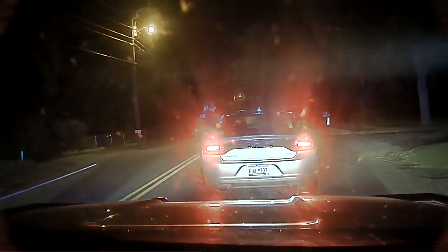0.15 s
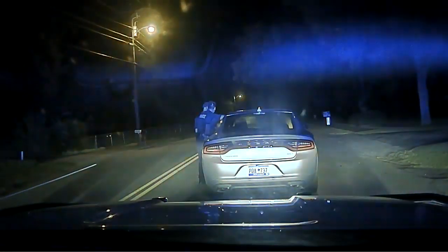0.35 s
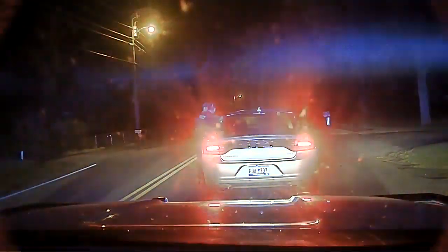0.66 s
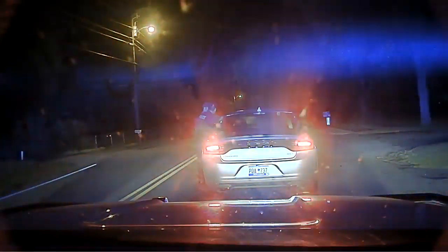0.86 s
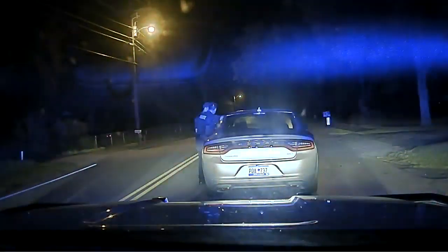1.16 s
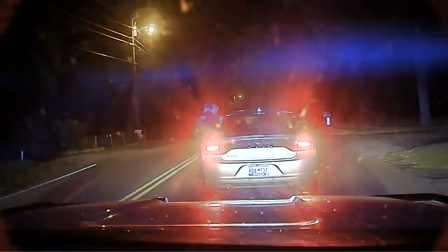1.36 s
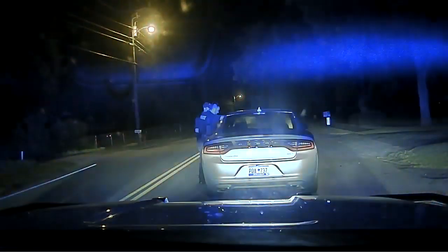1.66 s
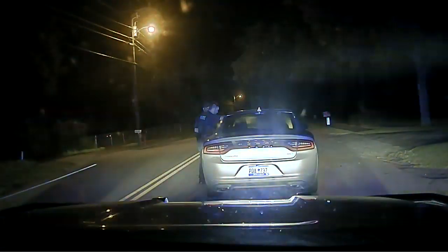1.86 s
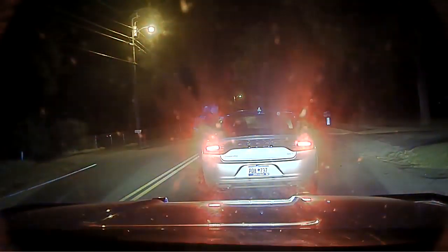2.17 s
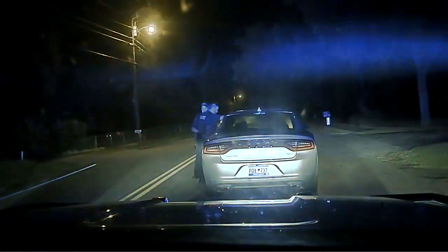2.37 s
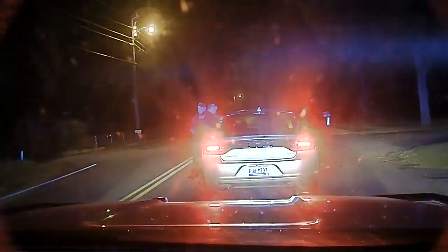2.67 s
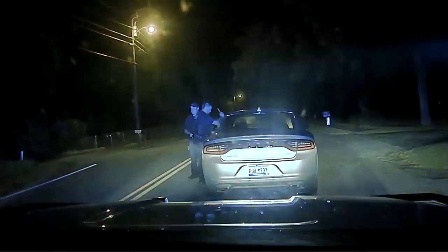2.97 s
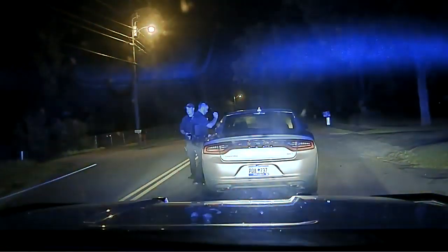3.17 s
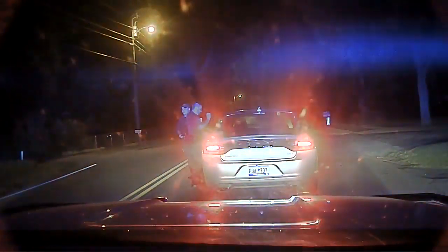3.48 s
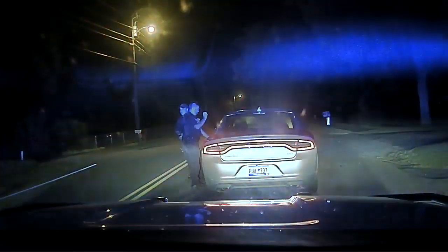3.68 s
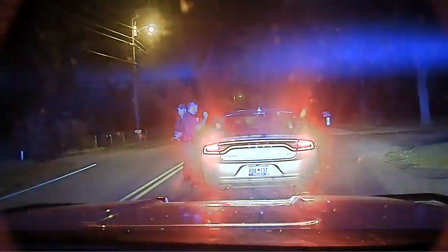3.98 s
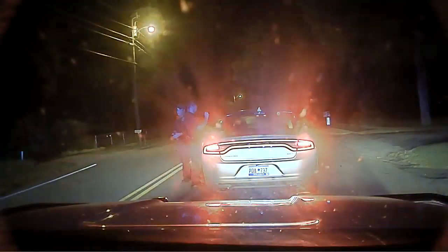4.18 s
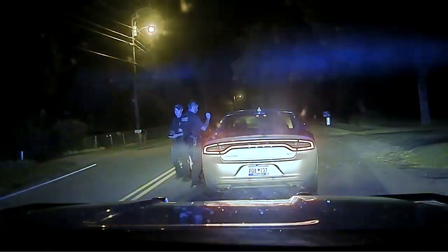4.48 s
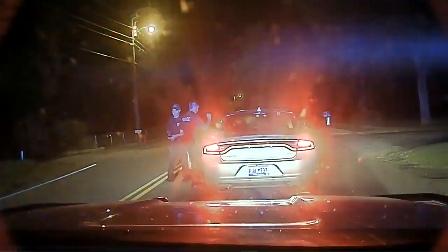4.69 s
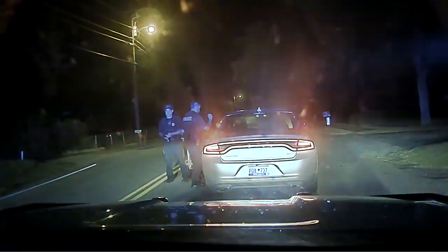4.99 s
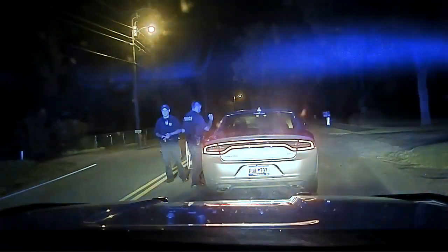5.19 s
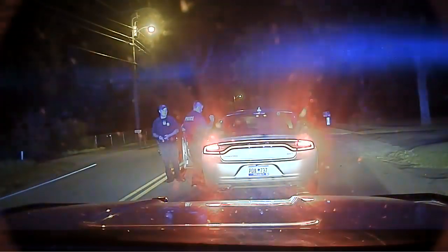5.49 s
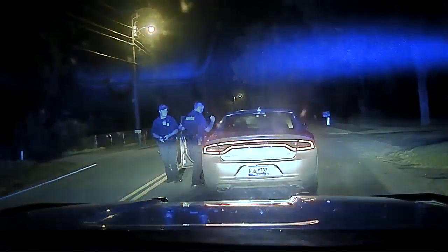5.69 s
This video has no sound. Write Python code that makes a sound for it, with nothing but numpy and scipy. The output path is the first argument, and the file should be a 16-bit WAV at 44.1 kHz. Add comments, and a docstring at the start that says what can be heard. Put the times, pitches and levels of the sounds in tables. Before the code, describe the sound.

Hard overloaded car door slam beside an idling vehicle, faint metallic tinkles, then scattered muffled thuds and scratchy handling scuffs over hiss.

```python
"""A car door slams hard enough to overload the microphone, beside an idling car at night.
Blows ring the body modes and rattle the trim; later knocks strike the same body, with gritty scuffs of dense grains.
Small metal parts tinkle as wavering sines. Behind them a low firing tone with a filtered-noise drone idles on,
a grainy rustle comes and goes, and the preamp hisses. One microphone feeds only the right channel."""
import sys
import numpy as np
from scipy import signal
from scipy.fft import rfft, irfft
from scipy.io import wavfile
from scipy.ndimage import uniform_filter1d

SR = 44100
rng = np.random.default_rng(int(sys.argv[2]) if len(sys.argv) > 2 else 0)


def inscribe(sig):
    """Save sig as 16-bit PCM at rate SR to the path in sys.argv[1].

    A 1-D sig is mono; a 2-D sig holds one channel per row.
    Samples are clipped to [-1, 1] before scaling.
    """
    pcm = np.round(np.clip(np.atleast_2d(sig).T, -1, 1) * 32767)
    wavfile.write(sys.argv[1], SR, pcm.astype(np.int16))


def natural_amplitude(level_db):
    """Convert a level in decibels to a linear amplitude factor, elementwise."""
    exponent = np.asarray(level_db, float) / 20
    return 10 ** exponent


N = 257984
T = np.arange(N) / SR


def level(x, db):
    """Scale to an rms level in dB."""
    return x * natural_amplitude(db) / np.sqrt(np.mean(x ** 2))


def bin_hz(count):
    """Frequencies of the rfft bins of a sound of this many samples."""
    return np.arange(count // 2 + 1) * SR / count


def colour(x, points):
    """Filter by (Hz, dB) points joined on a log-frequency axis."""
    hz, db = np.transpose(points)
    f = np.maximum(bin_hz(len(x)), 1)
    gain_db = np.interp(np.log(f), np.log(hz), db, left=-60, right=-60)
    return irfft(rfft(x) * natural_amplitude(gain_db), len(x))


def walk(rate):
    """Random levels held 1 / rate s and slewed twice; spread near 1."""
    hold = int(SR / rate)
    steps = np.repeat(rng.standard_normal(N // hold + 1), hold)
    return 1.17 * uniform_filter1d(uniform_filter1d(steps, hold), hold)[:N]


def fade(t, rise_s, t60):
    """Smooth rise, then exponential decay by 60 dB in t60 seconds."""
    rise = (1 - np.exp(-t / max(rise_s, 1e-4))) ** 2
    return rise * np.exp(-np.log(1000) * t / max(t60, .01))


def add(out, s, x, peak_db):
    """Mix a sound in at time s with a given peak."""
    i = int(s * SR)
    out[i:i + len(x)] += (x * natural_amplitude(peak_db) / np.abs(x).max())[:N - i]


# What the car body rings with.
# Each row: mode in Hz, relative level in dB, t60 in seconds at ring factor 1.
BODY_MODES = [(50.2, -2, 0.67), (65.12, 1, 1), (84.6, -9, 0.73), (105, 3, 0.5), (121.2, 5.5, 0.45),
              (133.9, 3.5, 0.46), (169.5, -2.5, 0.42), (187.34, 6.5, 0.54), (217.1, -9.5, 0.51),
              (237.4, -6.5, 0.63), (268.4, -2, 0.29), (315, -7, 0.19), (339.6, 0.5, 0.41), (373.6, 7, 0.26),
              (442.5, 6, 0.22), (478, -8.5, 0.21), (526.4, 9, 0.2), (578.8, 10.5, 0.13), (635, -2, 0.12),
              (684, -7.5, 0.07), (776.3, 6, 0.16), (843, -4.5, 0.37), (905, 1.5, 0.1), (984.6, 4.5, 0.091)]
# How long the rattling trim and panels sound. Each row: frequency in Hz, t60 in seconds at ring factor 1.
RATTLE_DECAY = [(40, 0.48), (150, 0.42), (500, 0.43), (1500, 0.22), (4000, 0.036), (10000, 0.036)]


def blow(centre_hz, slope_db, ring, rattle_db):
    """One blow: body modes near the favoured pitch ring most; trim and panels rattle as dense decaying noise."""
    t = T[:2 ** 15]
    push_s = 1 / centre_hz  # a softer contact pushes longer and sounds lower

    def weight(f):
        """Fall-off away from the favoured pitch, gentler below it."""
        side = np.where(f > centre_hz, 1, 0.56)
        return natural_amplitude(slope_db * np.abs(np.log2(f / centre_hz)) * side)

    modes = 0
    for hz, db, t60 in BODY_MODES:
        phase = 0.94 * rng.standard_normal()  # the modes set off nearly together
        tone = np.sin(2 * np.pi * hz * t + phase)
        modes = modes + natural_amplitude(db) * weight(hz) * tone * fade(t, push_s, ring * t60)

    spectrum = rfft(rng.standard_normal(len(t)))
    f = bin_hz(len(t))
    hz, t60 = np.transpose(RATTLE_DECAY)
    rattle = 0
    for mid_hz in 60 * 2 ** np.arange(0, 7.6, .5):
        band = irfft(spectrum * np.exp(-(np.log2((f + 1) / mid_hz) / .3) ** 2), len(t))
        muffled = weight(mid_hz) / (1 + (mid_hz / 2200) ** 2)  # padded trim swallows the treble
        band_t60 = ring * np.interp(np.log(mid_hz), np.log(hz), t60)
        rattle = rattle + muffled * band / band.std() * fade(t, min(push_s, .004), band_t60)
    return modes + natural_amplitude(rattle_db) * rattle


# The slam and the later knocks on the car body. Each row: start in seconds, peak in dB before the preamp,
# favoured pitch in Hz, fall-off above that pitch in dB per octave, ring length as a factor.
BLOWS = [(0.228, -37.5, 297, -1.5, 0.59), (0.257, -28, 300, -2, 0.27), (0.299, -14.5, 487, -6.5, 0.32),
         (0.308, -8, 415, -6.5, 0.19), (0.317, 6, 79.3, -4.5, 0.68), (0.321, -8.5, 1510, -1, 0.25),
         (0.342, -11.5, 1300, -2.5, 0.42), (0.355, -5, 250, -2.5, 0.51), (0.363, -11, 1700, -0.5, 0.58),
         (0.381, -17.5, 900, -1, 0.84), (0.400, -5.5, 110, -5, 0.3), (0.443, -11, 91, -6, 0.46),
         (0.515, -39, 1250, -12, 0.39), (0.52, -25, 70, -21, 0.35), (1.68, -23.5, 101, -24, 0.33),
         (2.237, -24.5, 408, -6, 0.7), (2.556, -11, 162, -10.5, 1.16), (2.709, -25.5, 370, -17, 0.24),
         (3.365, -25.5, 125, -17, 1.23), (3.607, -17, 135, -11, 0.62), (3.946, -27.5, 105, -23, 1.7),
         (4.162, -16.5, 123, -17.5, 0.69), (4.723, -29.5, 123, -12.5, 0.47), (5.489, -37, 305, -4, 0.86)]
# The closing door pumps the cabin air.
# One row: start in seconds, peak in dB before the preamp, pitch in Hz, t60 in seconds.
AIR_PUMP = (0.345, -11.5, 26.5, .46)


def knocks():
    """The slam (seal, latch, main blow, rebounds) and later knocks strike one body; cabin air booms as a low sine."""
    out = np.zeros(N)
    for s, db, hz, slope_db, ring in BLOWS:
        rattle_db = 3.5 + 0.74 * slope_db  # a hard blow spreads over many modes and shakes the trim more
        add(out, s, blow(hz, slope_db, ring, rattle_db), db)
    s, db, hz, t60 = AIR_PUMP
    t = T[:SR]
    add(out, s, np.sin(2 * np.pi * hz * t) * fade(t, 0.03, t60), db)
    return out


# Gritty scuffs. Each row: start in seconds, peak in dB before the preamp, tilt in dB per octave,
# first and second favoured resonance in Hz.
SCUFF_HITS = [(1.225, -53, -3, 3150, 3150), (1.255, -59, -2, 2500, 3150), (2.237, -48, -8.5, 2400, 1950),
              (2.347, -31.5, -1, 1400, 1400), (2.557, -30.5, -5, 1050, 2300), (2.571, -32, -6, 1120, 1970),
              (2.648, -42, -9.5, 2050, 3100), (2.676, -31.5, -3.5, 1990, 3020), (2.71, -39, -5, 1370, 2000),
              (3.081, -52.5, -4, 3020, 3100), (3.151, -42.5, -5, 1030, 1400), (3.37, -43.5, -2, 1430, 1950),
              (3.391, -28.5, -2.5, 2000, 3200), (3.406, -36.5, -8, 1400, 1950), (3.57, -39, -2, 1946, 3120),
              (3.607, -35, -2, 1830, 1400), (3.805, -37, -3.5, 1415, 1900), (3.823, -26.5, 0, 1470, 2500),
              (3.841, -38, -4, 1060, 3270), (3.948, -40.5, -3.5, 1400, 4100), (4.164, -36, -7, 998, 1900),
              (4.2, -39, -10, 1000, 1900), (4.278, -33.5, -1.5, 2150, 2970), (4.301, -27, -3, 1970, 3020),
              (4.459, -49.5, -1, 1940, 1950), (4.722, -39, -3.5, 1800, 4100), (4.78, -44, -16, 1400, 1400)]
# Colour of the grit before its tilt. Each row: frequency in Hz, relative level in dB.
GRIT_COLOUR = [(290, -22), (500, 2.5), (1460, -13.5), (1600, -17), (1970, -7), (2300, -5.5), (2790, -2),
               (4270, -7.5), (11000, -22), (14300, -58), (22000, -120)]
# Short resonances under a scuff.
# Each row: frequency in Hz, half-width to -6 dB in Hz, gain in dB at a favoured pitch.
CLACK_PEAKS = [(1022, 80, 10), (1400, 340, 10.5), (1744, 170, 5), (1970, 140, -3), (2410, 500, -9.5),
               (3200, 220, -13.5), (3820, 500, -14)]


def scuffs():
    """Dense one-sample grains coloured as grit ring short resonances, most those nearest the favoured pitches."""
    out, t = np.zeros(N), T[:SR // 2]
    f = bin_hz(len(t))
    contact = fade(t, 0.0022, 0.77) * np.exp(-(t / 0.034) ** 2)
    ring_on = natural_amplitude(-1.0) * fade(t, 0.033, 0.21)
    for s, db, tilt_db, *favoured_hz in SCUFF_HITS:
        grains = rng.standard_normal(len(t)) * natural_amplitude(1.6 * rng.exponential(size=len(t)))
        grit = colour(grains, [(hz, g + tilt_db * np.log2(hz / 2000)) for hz, g in GRIT_COLOUR])
        peaks = 0
        for hz, width, gain_db in CLACK_PEAKS:
            octaves_off = np.abs(np.log2(hz / np.array(favoured_hz))).min()
            peaks = peaks + natural_amplitude(gain_db - 17.2 * octaves_off) / (1 + 1j * (f - hz) / width) ** 2
        ring = irfft(rfft(grit) * peaks, len(t))
        bare = natural_amplitude(-8) * grit * contact
        add(out, s, bare + ring * (contact + ring_on), db)
    return out


# Touches of small metal parts. Each row: start in seconds, peak in dB before the preamp, index of the part.
TOUCHES = [(1.215, -65, 3), (1.215, -63, 0), (1.24, -62, 1), (1.29, -70, 3), (1.285, -68, 1),
           (1.30, -59, 0), (1.31, -69, 2), (1.345, -65, 2), (1.385, -70, 3), (1.41, -65, 2),
           (1.445, -59, 3), (1.445, -70, 5), (1.475, -67, 2), (1.5, -71, 3), (1.562, -58, 4)]
# The small metal parts. Each row: mean pitch in Hz, t60 in seconds.
METAL_PARTS = [(1075, .18), (2315, .12), (2440, .14), (2985, .1), (3225, .065), (3690, .16)]


def tinkles():
    """Faint rings of small metal parts; each swells in and wavers in pitch and level as the parts keep touching."""
    out, t = np.zeros(N), T[:SR // 3]
    waver = 1 + .011 * walk(120.0)
    flutter = natural_amplitude(5.0 * walk(110.0))
    for s, db, part in TOUCHES:
        hz, t60 = METAL_PARTS[part]
        start = int(s * SR)
        now = slice(start, start + len(t))
        tone = np.sin(2 * np.pi * hz * np.cumsum(waver[now]) / SR)
        add(out, s, tone * flutter[now] * fade(t, .012, t60), db)
    return out


def rumble():
    """Size of the low rumble that swells in after each blow and dies away."""
    size = 0
    for s, db, hz, slope_db, ring in BLOWS:
        swell = fade(np.maximum(T - s, 0), 0.016, ring * 1.36)
        size = size + natural_amplitude(-32.5 + 0.5 * db) * swell  # grows half a dB per dB of blow
    return size


# Firing tone. Each row: multiple of the firing rate, rms level in dB before its wavering and the preamp.
FIRING_TONE = [(1, -46), (2, -57), (3, -55)]
# Colour of the drone. Each row: frequency in Hz, relative level in dB.
DRONE_COLOUR = [(26, -7), (45, 2.5), (55, -13.5), (108, 3), (134, -9.5), (151, -3), (204, -2), (300, -15),
                (346, -17.5), (434, -11.5), (832, -31.5), (1030, -45), (1250, -39.5), (3000, -64),
                (3900, -94), (6600, -120)]


def engine():
    """Firing tone that wavers a little, and above it a broad drone in the body that flickers and swells after blows."""
    idle_hz = 29.96 * (1 + 0.018 * walk(4.0))  # firing rate
    phase = 2 * np.pi * np.cumsum(idle_hz) / SR
    tone = 0
    for k, db in FIRING_TONE:
        tone = tone + np.sqrt(2) * natural_amplitude(db + 2.16 * k * walk(4.36)) * np.sin(k * phase)
    above = signal.butter(6, 52, "high", fs=SR, output="sos")
    noise = colour(rng.standard_normal(N), DRONE_COLOUR)
    drone = level(signal.sosfilt(above, noise), 0)
    drone_size = np.hypot(natural_amplitude(-42), rumble())
    flicker = natural_amplitude(0.4 * walk(27.0))
    return tone + drone * drone_size * flicker


# Colour of the rustle. Each row: frequency in Hz, relative level in dB.
RUSTLE_COLOUR = [(300, 13.5), (600, 0.5), (1000, -2), (1600, -12), (2500, -18.5), (5000, -29)]
# How the rustle comes and goes. Each row: time in seconds, level in dB before the preamp.
RUSTLE_SWELL = [(0.0, -58.5), (0.25, -54.5), (0.45, -44.5), (0.62, -53.5), (0.98, -57.5), (1.4, -54),
                (2.07, -55), (2.59, -54.5), (2.7, -46.5), (2.85, -58.5), (3.34, -55.5), (3.42, -46.5),
                (3.55, -49.5), (3.8, -47.5), (4.01, -52.5), (4.3, -53), (4.58, -56.5), (4.89, -53.5),
                (5.1, -59), (5.85, -58.5)]


def rustle():
    """A soft grainy rustle: noise of uneven level, coloured, that swells with movement nearby."""
    grains = rng.standard_normal(N) * natural_amplitude(1.03 * walk(40.0))
    rustle_db = np.interp(T, *np.transpose(RUSTLE_SWELL))
    return level(colour(grains, RUSTLE_COLOUR), 0) * natural_amplitude(rustle_db)


def scene():
    """Everything reaches one microphone, wired to the right channel."""
    mono = knocks() + scuffs() + tinkles() + engine() + rustle()
    return np.array([np.zeros(N), mono])


def low_pass(x):
    """Removes everything above the highest recorded frequency."""
    return signal.sosfilt(signal.butter(12, 11080, fs=SR, output="sos"), x)


def record(dry):
    """The preamp adds hiss and clips flat; the top is cut; the left channel holds only a tiny constant."""
    gain_db, hiss_db, clip_level, top_hz = 6, -58.5, .96, 11080
    hiss = level(rng.standard_normal(N), hiss_db)
    mono = np.clip(natural_amplitude(gain_db) * dry[1] + hiss, -clip_level, clip_level)
    top_cut = signal.cheby2(12, 30, top_hz, fs=SR, output="sos")
    mono = np.clip(signal.sosfiltfilt(top_cut, mono), -1, 1)
    left = np.full(N, 1 / 32768)  # one 16-bit step
    return low_pass(np.array([left, mono]))


dry = scene()
out = record(dry)
inscribe(out)
```